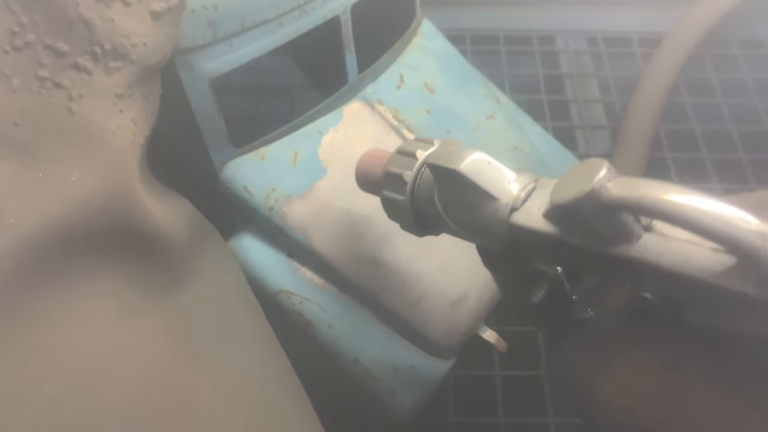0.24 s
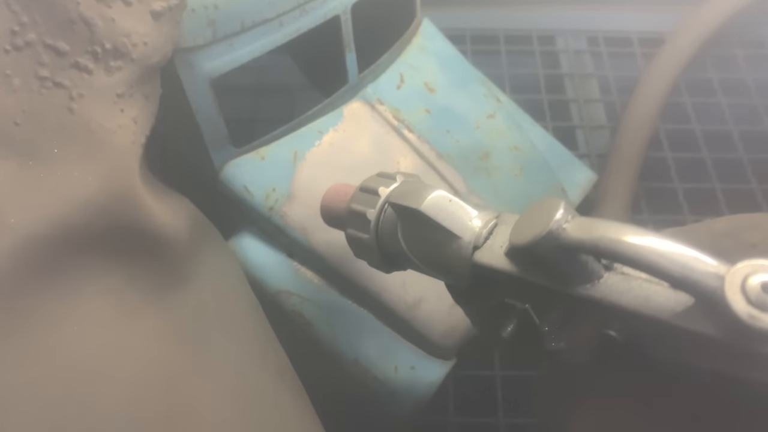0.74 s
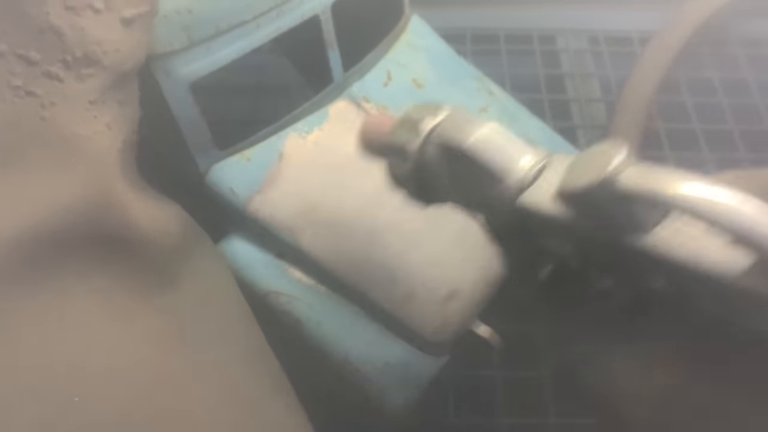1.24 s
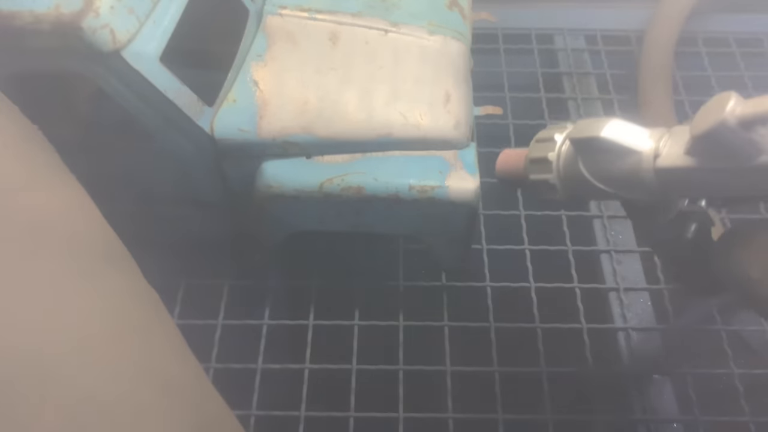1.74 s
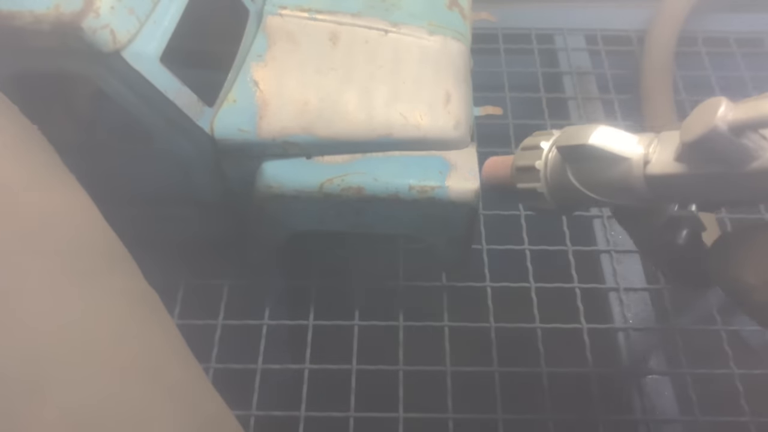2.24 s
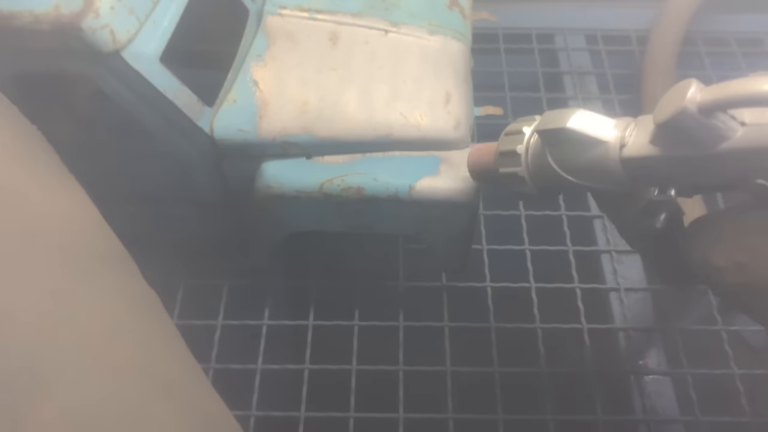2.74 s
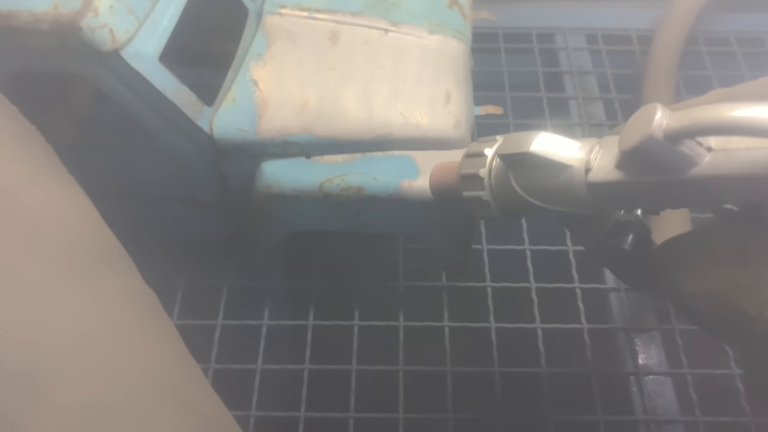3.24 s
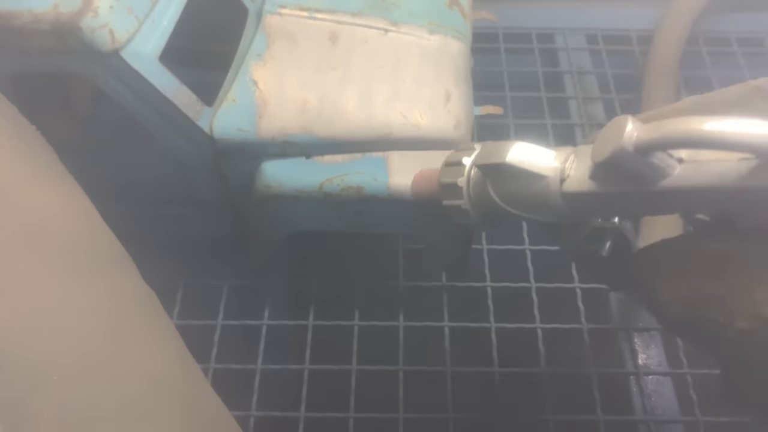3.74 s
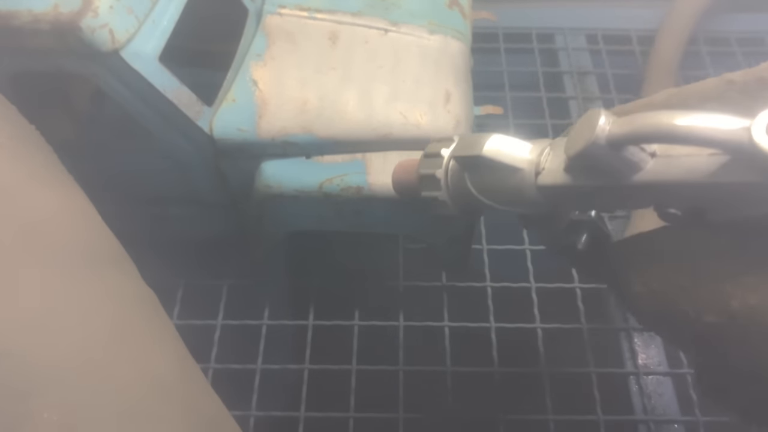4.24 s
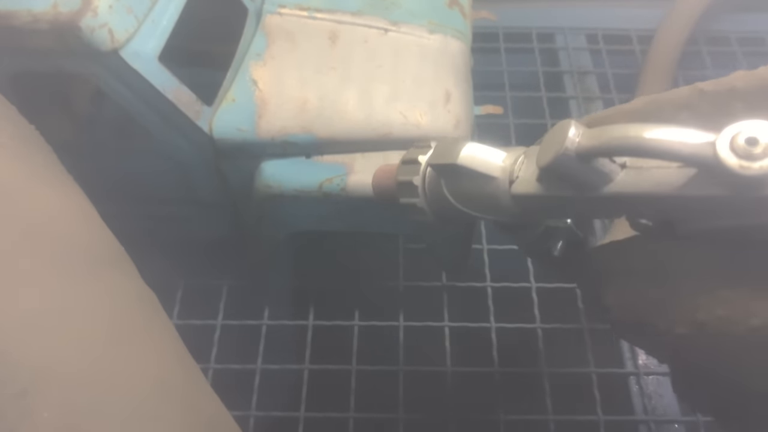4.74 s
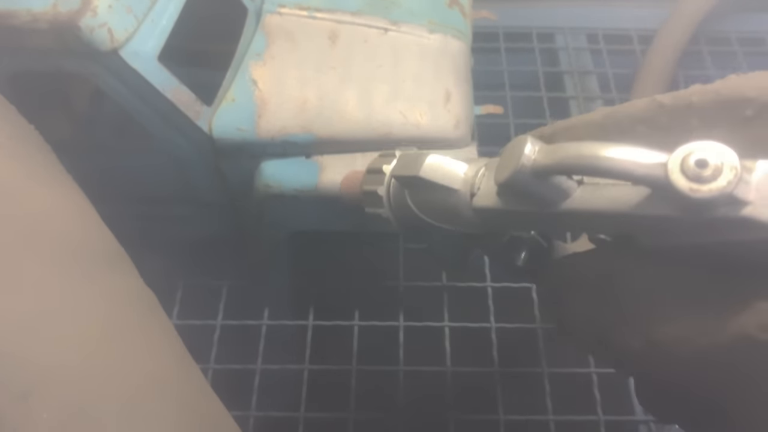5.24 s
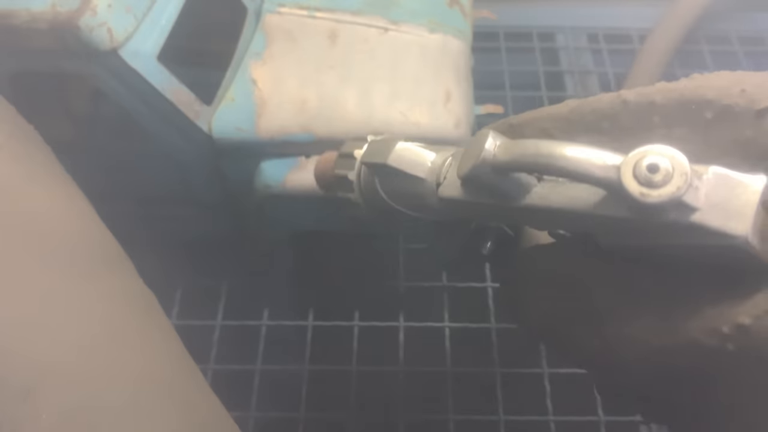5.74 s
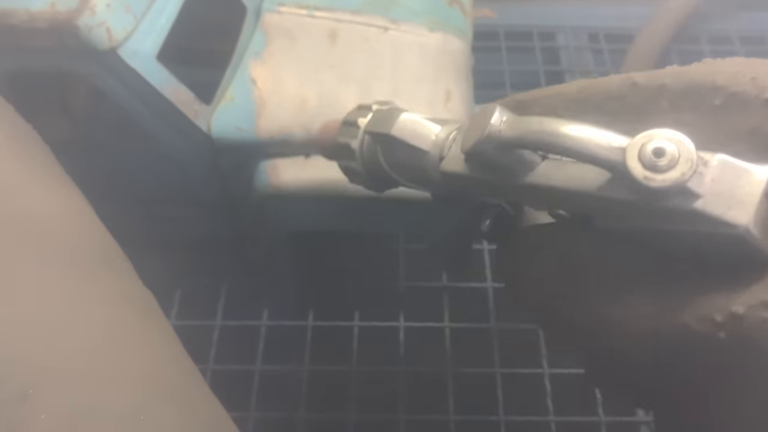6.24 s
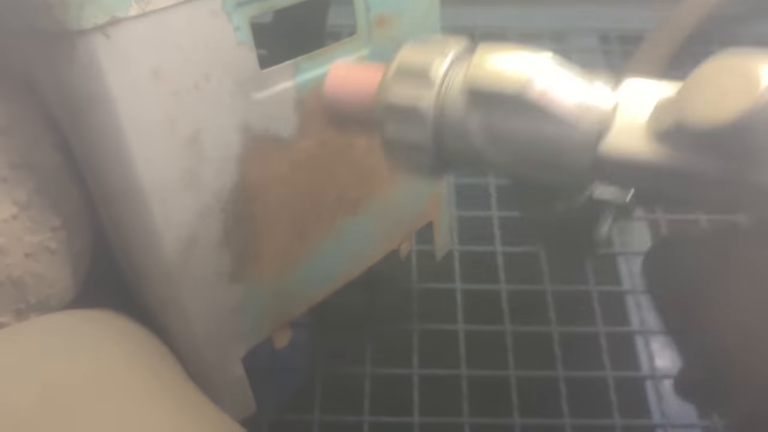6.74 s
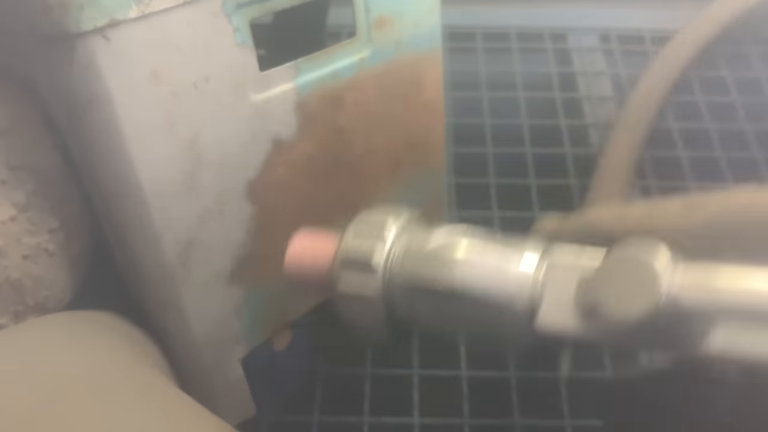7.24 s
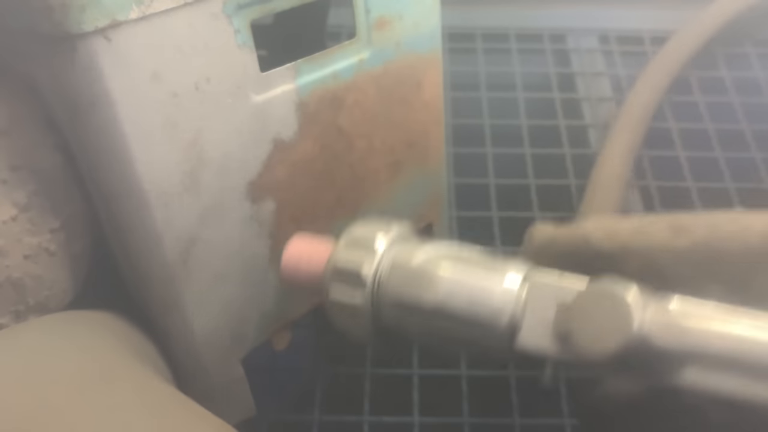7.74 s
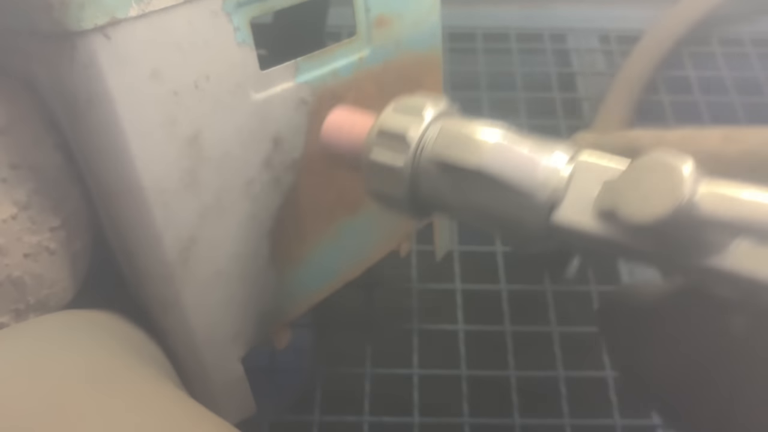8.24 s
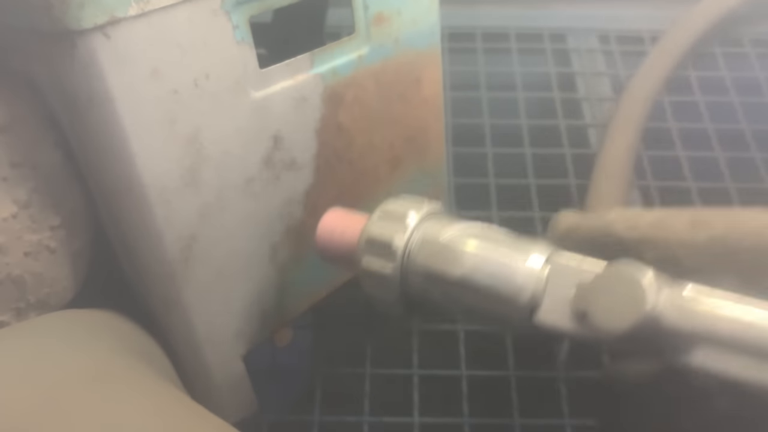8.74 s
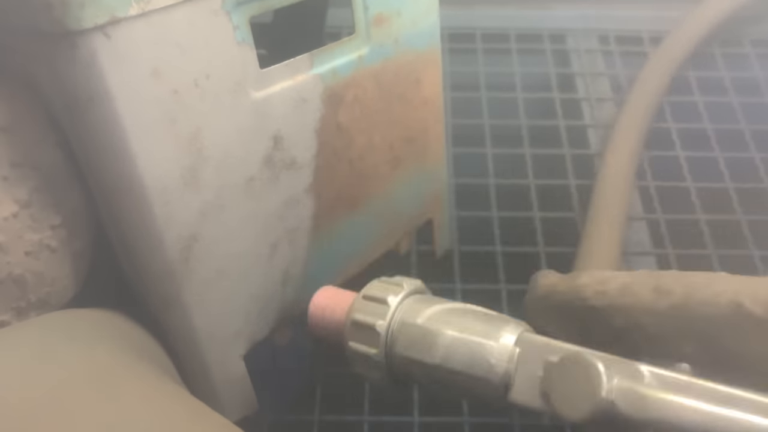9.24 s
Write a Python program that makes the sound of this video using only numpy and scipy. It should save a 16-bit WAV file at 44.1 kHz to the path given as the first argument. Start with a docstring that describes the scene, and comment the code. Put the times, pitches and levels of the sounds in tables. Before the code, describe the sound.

A steady airy hiss inside a steel cabinet dies away, then brighter grit blasting sizzles on thin sheet metal, finally fluttering and drumming on a panel.

```python
"""Inside a steel blast cabinet: a small sheet-metal body is sandblasted, first hood, then fender, then door.
An air jet and a hail of grit ring the part and the cabinet, whose walls scatter the sound to one microphone.
The air is released after the hood; a thin whistle runs under each pass, strongest on the fender.
The grit feed surges now and then, mostly on the door, where changing aim trades sizzle for drumming.
Low rumble comes from gloves and part moving; both channels carry the same sound."""
import sys
import numpy as np
from scipy import signal
from scipy.fft import rfft, irfft, next_fast_len
from scipy.io import wavfile
from scipy.ndimage import map_coordinates

SR = 44100
rng = np.random.default_rng(int(sys.argv[2]) if len(sys.argv) > 2 else 0)


def store_pcm(level_fs):
    """Save levels as 16-bit WAV."""
    pcm = np.round(np.clip(level_fs, -1, 1) * 32767).astype(np.int16)
    wavfile.write(sys.argv[1], SR, np.atleast_2d(pcm).T)


N = 417627
TIME, HZ = np.arange(N) / SR, np.fft.rfftfreq(next_fast_len(N, True), 1 / SR)
FENDER_S, DOOR_S = 1.526, 6.539  # the nozzle opens on the fender and on the door


def amp(db):
    """Decibels to gain."""
    return 10 ** (np.asarray(db) / 20)


def evened(x):
    """Scales to rms 1."""
    return x / np.sqrt(np.mean(x ** 2) + 1e-20)


def read(points):
    """A short spectrum joined by lines on a log-frequency axis, in dB."""
    hz, db = np.transpose(points)
    return np.interp(np.log(HZ + 1), np.log(hz), db)


def spectrum(x):
    """Long Fourier transform."""
    return rfft(x, next_fast_len(N, True))


def wave(z):
    """Back from a spectrum to sound."""
    return irfft(z, next_fast_len(N, True))[:N]


def resonance(hz, width_hz, power=2):
    """A peak of height 1 over frequency; a higher power makes it narrower."""
    return 1 / (1 + (2 * (HZ - hz) / width_hz) ** 2) ** power


def drift(rate_hz):
    """Smooth chance of rms 1 that moves up to about the given rate."""
    knots = rng.standard_normal(4096)
    knot_hz = np.fft.rfftfreq(4096, TIME[-1] / 4096)
    slow = irfft(rfft(knots) / (1 + (knot_hz / rate_hz) ** 4))
    return evened(np.interp(TIME, np.linspace(0, TIME[-1], len(slow)), slow))


def gate(start_s, end_s, ramp=.006):
    """One between two moments, with short ramps (s) centred on them."""
    opening = np.clip((TIME - start_s) / ramp + .5, 0, 1)
    return opening * np.clip((end_s - TIME) / ramp + .5, 0, 1)


def swell(moment_s, half_s):
    """A smooth bump over time, 1 at its moment."""
    return np.exp(-.5 * ((TIME - moment_s) / half_s) ** 2)


def grit(grains_per_s, spread_db):
    """Single grains strike the metal at random with either sign; a few are large."""
    size = amp(spread_db * np.minimum(rng.exponential(1, N), 4))
    struck = rng.random(N) < grains_per_s / SR
    return evened(size * rng.choice([-1, 1], N) * struck)


def cabinet(wet, t60):
    """Frequency response of the direct path plus dense echoes from the steel walls, decaying 60 dB in t60 (s)."""
    t = TIME[:SR // 2]
    echoes = rng.standard_normal(len(t)) * amp(-60 * t / t60) * (t > .004)
    return (1 + wet * spectrum(echoes / np.linalg.norm(echoes))) / np.sqrt(1 + wet ** 2)


def glancing(x, echo=0.2, delay_s=.004, sway_s=.00004, count=3):
    """Reflections off nearby metal shift as the nozzle moves, so fine ripples wander through the treble."""
    out = x
    for _ in range(count):
        late = TIME - delay_s * rng.uniform(.5, 2) - sway_s * drift(1.9)
        out = out + echo * map_coordinates(x, [late * SR], order=3)
    return out / np.sqrt(1 + count * echo ** 2)


# the three bands of the blast, in order roar of the jet, hiss of the air, sizzle of the grit: low_hz, high_hz
BANDS = [(500, 2200), (2200, 8000), (8000, 15700)]


def blast(levels, colour, modes, grit_share, grains_per_s, flutter_db, flutter_hz, churn_db, wet):
    """Turbulent air and grit ring the part and the cabinet; levels set roar, hiss and sizzle over time."""
    share = np.clip(grit_share, 0, 1)
    air = rng.standard_normal(N)
    drive = np.sqrt(1 - share) * air + np.sqrt(share) * grit(grains_per_s, spread_db=2.0)
    body_db = read(colour) + sum(db * resonance(hz, width) for hz, width, db in modes)
    ringing = spectrum(drive) * amp(body_db) * cabinet(wet, t60=0.12)
    # soft crossovers at the band edges; neighbouring steps differ by one band
    above = [1, 1 / (1 + (2200 / (HZ + 1)) ** 8), 1 / (1 + (8000 / (HZ + 1)) ** 8), 0]
    flutter, surge, out = flutter_db * drift(flutter_hz), feed_db(), 0
    for k, (low, high) in enumerate(BANDS):
        inside = (HZ > low) & (HZ < high)
        strength = np.sqrt(np.sum(abs(ringing[inside]) ** 2) / (len(HZ) * N))  # rms of the band
        band = wave(ringing * (above[k] - above[k + 1])) / strength
        if k == 2:
            band = glancing(band)
        # the uneven feed shakes all bands at once, eddies churn each by itself; surges spare the roar
        level_db = levels[k] + flutter + churn_db * drift(22) + surge * (k > 0)
        out = out + band * amp(level_db)
    return out


HOOD_DB = (-41.5, -29.5, -39.7)  # base level of (roar, hiss, sizzle)
# the trigger is let go and the hose empties: moment, time constants in s and falls of (roar, hiss, sizzle)
RELEASE_S, EMPTYING_S, RELEASE_FALL_DB = 1.257, (.24, 0.099, 0.11), (66, 62, 66)


def hood_levels():
    """Roar, hiss and sizzle hold steady until the trigger is let go; the roar dies last."""
    t = np.maximum(TIME - RELEASE_S, 0)
    return [HOOD_DB[k] - RELEASE_FALL_DB[k] * (1 - np.exp(-t / EMPTYING_S[k])) for k in range(len(BANDS))]


# broad colour of the blast on the hood: pitch_hz, density_db (per Hz, relative)
HOOD_COLOUR = [(40, -35.1), (100, -20.5), (220, -10.9), (450, -8.0), (700, -12.2), (1500, -14.0),
               (2200, -8.4), (3200, 0.0), (4500, -0.5), (7000, -4.5), (9000, -10.3), (10500, -15.1),
               (13000, -16.9), (15600, -19.6)]
# resonances and notches of part and cabinet at the hood: pitch_hz, width_hz, boost_db
HOOD_MODES = [(474, 45, 10.0), (523, 44, -10.2), (584, 38, 4.0), (648, 128, -7.1), (697, 41, 10.5),
              (725, 35, -5.2), (798, 35, 7.6), (972, 43, 7.6), (1141, 141, 8.6), (1391, 73, 9.1),
              (1516, 90, 4.3), (1708, 80, 9.4), (2106, 117, 5.0), (2533, 80, 3.8), (2679, 55, 5.3),
              (2845, 195, -3.8), (3269, 43, -7.9), (4296, 64, 8.6)]


def hood_pass():
    """Mostly air on the hood, a nearly even hiss until the air is released."""
    return blast(hood_levels(), HOOD_COLOUR, HOOD_MODES, grit_share=0.092, grains_per_s=6000,
                 flutter_db=0.0, flutter_hz=60, churn_db=0.2, wet=0.37)


# whistles of the air: start_s, end_s, pitch_hz, level_db, wander_hz
WHISTLES = [(0, 1.27, 4292, -49, 14), (1.525, 6.54, 1820.5, -47.2, 1.6), (6.54, 9.47, 2090, -52.5, 4)]


def whistles():
    """Thin edge tones of the air, wavering in pitch and strength."""
    out = 0
    for start, end, hz, db, wander_hz in WHISTLES:
        turns = np.cumsum(hz + wander_hz * drift(6.9)) / SR
        tone = np.sqrt(2) * np.sin(2 * np.pi * turns)
        out = out + tone * amp(db + 0.34 * drift(4.2)) * gate(start, end)
    return out


# low noise inside the cabinet: pitch_hz, density_db (per Hz, relative)
RUMBLE_COLOUR = [(20, -33.5), (40, -15), (65, -6), (140, -3), (250, -1.5), (500, -7.5), (1500, -31),
                 (9000, -68)]
# the gloves shift the part: start_s, end_s, level_db, brightness_db_per_octave
SHIFTS = [(-.1, 1.2, -75, -3), (1.197, 1.353, -52.5, -2), (1.46, 1.53, -60, 3), (1.53, 1.72, -72, 2),
          (6.53, 6.92, -73, -3), (7.17, 7.21, -76, -7), (7.56, 7.6, -77, -7), (8.28, 8.32, -80, -7)]
SHIFT_RISE_S, SHIFT_FALL_DB_PER_S = .006, 135


def rumble():
    """Lumpy low noise of the gloves and the part moving in the cabinet."""
    noise, out = spectrum(rng.standard_normal(N)) * amp(read(RUMBLE_COLOUR)), 0
    for start, end, db, brightness in SHIFTS:
        scuff = evened(wave(noise * amp(brightness * np.log2(HZ + 20))))
        rise = np.clip((TIME - start) / SHIFT_RISE_S, 0, 1)
        out = out + scuff * rise * amp(db - SHIFT_FALL_DB_PER_S * np.maximum(TIME - end, 0))
    return out * amp(0.77 * drift(20))


FENDER_DB = (-40, -35.5, -26.5)  # base level of (roar, hiss, sizzle)
# pressure stored in the hose makes the start louder: length, excess of (roar, hiss, sizzle)
OVERSHOOT_S, OVERSHOOT_DB = 0.23, (6, 3, 1.5)
# the jet slips partly off the narrow fender: start_s, end_s, missed_share (0-1)
SLIPS = [(2.09, 2.22, 0.3), (2.69, 2.84, 0.37), (5.115, 5.29, 0.1), (6.196, 6.62, 0.5)]
SLIP_RAMP_S, SLIP_LOSS_DB = 0.046, (1.5, 1, 7.5)  # loss of (roar, hiss, sizzle) at a full miss
# the jet dwells on the flat and drums harder: (start, end), gain of (roar, hiss, sizzle)
DWELL_S, DWELL_DB = (4.19, 5.15), (1.4, 1.5, -0.4)


def fender_levels():
    """A strong start settles to a steady blast; slips off the metal dip it, and the flat lifts roar and hiss."""
    stored = np.exp(-((TIME - FENDER_S) / OVERSHOOT_S) ** 2)
    missed = sum(share * gate(start, end, ramp=SLIP_RAMP_S) for start, end, share in SLIPS)
    dwelling = gate(*DWELL_S, ramp=SLIP_RAMP_S)
    return [FENDER_DB[k] + OVERSHOOT_DB[k] * stored - SLIP_LOSS_DB[k] * missed + DWELL_DB[k] * dwelling
            for k in range(len(BANDS))]


# broad colour of the blast on the fender: pitch_hz, density_db (per Hz, relative)
FENDER_COLOUR = [(30, -70), (70, -56), (120, -36.8), (200, -7.8), (350, -15.3), (650, -4.7), (1300, -8.1),
                 (2400, -12.9), (4500, -11.4), (6500, -10.3), (8000, -4.9), (9700, -0.5), (12000, -0.5),
                 (14300, -1.0), (15600, -2.8)]
# resonances and notches of part and cabinet at the fender: pitch_hz, width_hz, boost_db
FENDER_MODES = [(296, 45, 6.0), (659, 41, 4.2), (935, 52, 4.2), (1024, 121, -3.0), (1150, 97, 4.3),
                (1326, 150, 3.6), (1682, 56, -4.9), (1793, 39, -8.2), (1930, 35, 4.0), (2063, 159, 6.6),
                (2263, 51, 4.6), (2361, 91, -7.0), (2721, 156, 5.5), (3202, 144, 7.4), (3482, 79, -3.7),
                (3632, 105, 5.9), (3794, 95, 5.2), (4013, 338, 6.8), (5175, 115, 6.0), (5378, 370, 6.5),
                (5812, 246, 8.6), (6757, 899, 3.0), (7460, 114, 5.3), (9160, 137, 4.3), (9914, 181, 4.0),
                (11221, 416, 3.5), (12515, 147, 4.6)]


def fender_pass():
    """More grit in the stream: a bright sizzle from the narrow fender."""
    return blast(fender_levels(), FENDER_COLOUR, FENDER_MODES, grit_share=0.18, grains_per_s=6000,
                 flutter_db=0.3, flutter_hz=110, churn_db=0.58, wet=0.29)


# the jet catches an edge and one band flares: start_s, end_s, pitch_hz, width_hz, boost_db
FLARES = [(1.6, 2.65, 13950, 800, 4), (4.85, 5.2, 15050, 350, 4), (4.95, 5.15, 11000, 1200, 3),
          (5.15, 6.2, 14400, 400, 5.5), (6.52, 6.62, 910, 600, 2.5), (6.55, 6.9, 14100, 1600, 0),
          (7.2, 7.7, 12000, 900, 1), (7.15, 7.5, 6300, 400, 6), (7.95, 8.62, 3300, 1600, 3.5),
          (8.14, 8.5, 7550, 3500, 2), (8.7, 9.4, 9400, 1400, 3), (8.7, 9.5, 7000, 300, 7)]


def flared(x, fade_s=0.03):
    """Each flare lifts one band of the blast for a moment."""
    z, out = spectrum(x), x
    for start, end, hz, width, db in FLARES:
        band = wave(z * resonance(hz, width))
        out = out + (amp(db) - 1) * band * gate(start + fade_s / 2, end - fade_s / 2, ramp=fade_s)
    return out


# slugs of grit in the feed hose: moment_s, surge_db
SURGES = [(2.88, 0.5), (5.07, 1), (5.83, 0.5), (6.14, 0.5), (6.955, 2.5), (7.296, 1), (7.395, 0.5),
          (7.986, 2), (8.071, 2.5), (8.155, 2.4), (8.228, 2.8), (8.3, 1.5), (8.386, 2.5), (8.467, 2.5),
          (8.55, 1.8), (8.973, 1.5)]


def feed_db(width=0.018):
    """Each slug of grit swells the blast and leaves the stream leaner on both sides."""
    return sum(db * (2 * swell(s, width) - swell(s, 2 * width)) for s, db in SURGES)


# aim at the door: moment_s, aim (0 = grazing and sizzling, 1 = square on and drumming)
AIM = [(6.6, 0.12), (6.83, 0.13), (6.91, 0.66), (7.2, 0.39), (7.4, 0.14), (7.63, .25), (7.87, 0.67),
       (8.1, .75), (8.22, 0.12), (8.4, 0.18), (8.58, 0.84), (8.73, 0.48), (8.96, 0.089), (9.05, 0.22),
       (9.125, 0.97), (9.21, .05), (9.35, 0.24), (9.45, 1)]


def door_aim():
    """How squarely the jet meets the door."""
    return np.interp(TIME, *np.transpose(AIM))


DOOR_DB = (-36.5, -34, -23.5)  # base level of (roar, hiss, sizzle)
SQUARE_ON_DB = (3, 3.7, -7.5)  # what full aim adds to (roar, hiss, sizzle)
SAG_DB_PER_S = (1.0, 1.4, 1.5)  # the air pressure sags through the pass
# air comes before grit, then the feed chugs between the two and settles
GRIT_LAG_S, GRIT_LAG_DB = 0.029, -16
CHUG_HZ, CHUG_SETTLE_S, CHUG_DB = 8.8, 0.38, (3, 3.2, -1)
# the nozzle climbs to the window frame and back: moment, half length, gain of (roar, hiss, sizzle)
FRAME_S, FRAME_HALF_S, FRAME_DB = 8.3, 0.14, (-0.5, 4.5, 0.5)


def door_levels():
    """The feed chugs into life and the pressure sags, while the aim trades sizzle for roar and hiss."""
    t, aim = np.maximum(TIME - DOOR_S, 0), door_aim()
    chug = np.cos(2 * np.pi * CHUG_HZ * (t - GRIT_LAG_S)) * np.exp(-t / CHUG_SETTLE_S)
    at_frame = swell(FRAME_S, FRAME_HALF_S)
    roar, hiss, sizzle = (DOOR_DB[k] + SQUARE_ON_DB[k] * aim - SAG_DB_PER_S[k] * t + CHUG_DB[k] * chug
                          + FRAME_DB[k] * at_frame for k in range(len(BANDS)))
    return roar, hiss, sizzle + GRIT_LAG_DB * gate(0, DOOR_S + GRIT_LAG_S, ramp=0.011)


# modes of the door panel that the grit keeps sounding: pitch_hz, width_hz, grazed_level_db, square_on_extra_db
DOOR_RINGS = [(748, 90, -52, 5), (1534, 110, -44.5, 11.5)]
RING_SAG_DB_PER_S = 1.6


def door_ring():
    """Narrow noise at two panel modes: the hail of grit keeps them sounding, most when it hits square on."""
    sag, out = RING_SAG_DB_PER_S * np.maximum(TIME - DOOR_S, 0), 0
    for hz, width, db, square_on_db in DOOR_RINGS:
        hail = spectrum(rng.standard_normal(N))
        ring = evened(wave(hail * resonance(hz, width, power=1.3)))
        out = out + ring * amp(db + square_on_db * door_aim() - sag)
    return out


# broad colour of the blast on the door: pitch_hz, density_db (per Hz, relative)
DOOR_COLOUR = [(30, -62), (70, -51), (120, -44.5), (200, -13.0), (400, -13.1), (800, -7.5), (1600, -7.8),
               (3000, -10.1), (5000, -10.8), (8000, -9.7), (10000, -6.7), (11500, -6.2), (12900, 0.0),
               (14300, -5.8), (15600, -5.0)]
# resonances and notches of part and cabinet at the door: pitch_hz, width_hz, boost_db
DOOR_MODES = [(364, 101, 5.9), (487, 60, 4.9), (744, 102, 6.5), (1084, 181, 5.4), (1222, 79, -5.5),
              (1315, 105, 6.6), (1683, 150, -2.6), (1859, 100, 6.9), (1999, 41, 6.0), (2090, 38, 9.1),
              (2197, 40, -5.4), (2407, 126, 7.0), (2684, 58, 5.1), (2786, 71, 6.1), (3129, 137, 6.5),
              (3495, 106, 6.2), (3717, 208, 5.7), (3961, 48, 7.9), (4047, 47, 6.6), (4529, 145, 7.3),
              (4904, 89, 7.0), (5070, 300, -3.3), (5619, 696, 3.7), (6516, 899, 4.2), (7835, 122, 4.8),
              (8728, 550, 4.4), (10945, 465, 3.5)]


def door_pass():
    """The grittiest stream, of fewer grains, flutters on the door and keeps its panel ringing."""
    stream = blast(door_levels(), DOOR_COLOUR, DOOR_MODES, grit_share=0.32, grains_per_s=4500,
                   flutter_db=0.73, flutter_hz=70, churn_db=0.42, wet=0.28)
    return stream + door_ring()


def scene():
    """The three passes follow each other abruptly, heard through one microphone."""
    passes = hood_pass() * gate(-1, FENDER_S)
    valve = gate(FENDER_S, 10, ramp=0.01)  # the valve takes 0.01 s to open
    passes = passes + fender_pass() * valve * gate(0, DOOR_S)
    passes = passes + door_pass() * gate(DOOR_S, 10)
    return np.tile(flared(passes) + whistles() + rumble(), (2, 1))


# stretches in which the bass thins out: start_s, end_s
THIN_BASS = [(1.52, 4.2), (6.535, 6.86)]
EDGE_HZ = 15760  # upper limit of the sound


def record(dry):
    """The bass thins out for two stretches; then a steep low-pass sets the band limit."""
    thin = np.clip(sum(gate(start, end, ramp=0.012) for start, end in THIN_BASS), 0, 1)
    # pitch_hz, gain_db
    bass_loss = [(60, 6.5), (150, -13.5), (220, -14.5), (320, -9.5), (450, -3.0), (600, -1), (2500, 0)]
    loss = amp(read(bass_loss))
    out = np.array([(1 - thin) * x + thin * wave(spectrum(x) * loss) for x in dry])
    low_pass = signal.firwin(1023, EDGE_HZ, window=("kaiser", 9), fs=SR)
    return signal.oaconvolve(out, low_pass[None], "same")


dry = scene()
out = record(dry)
store_pcm(out)
```